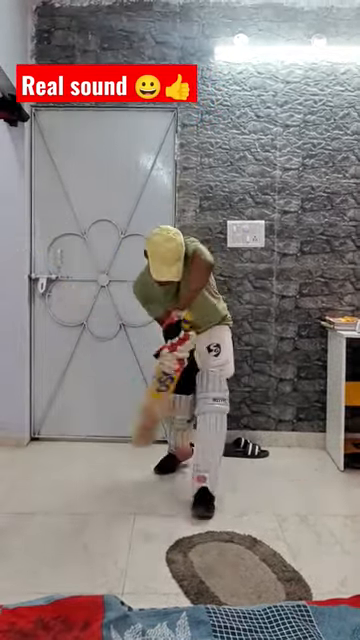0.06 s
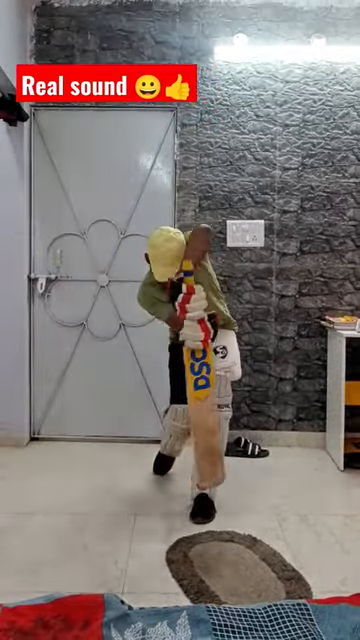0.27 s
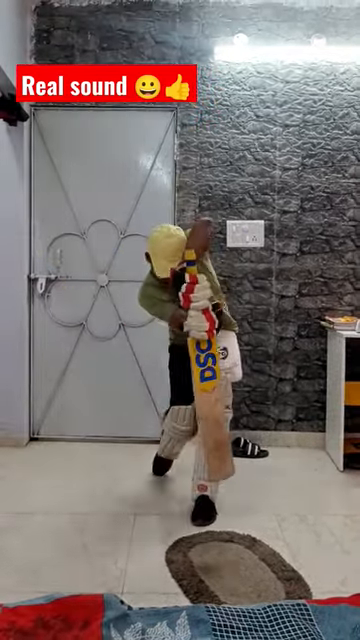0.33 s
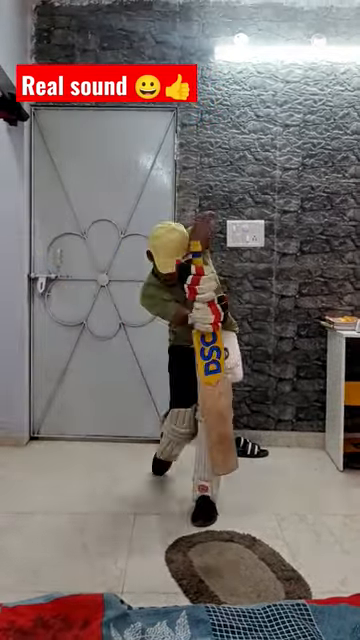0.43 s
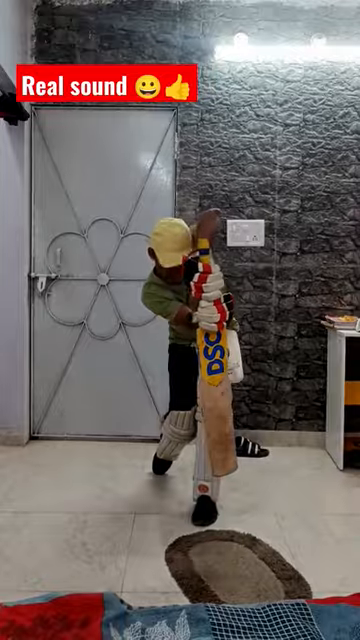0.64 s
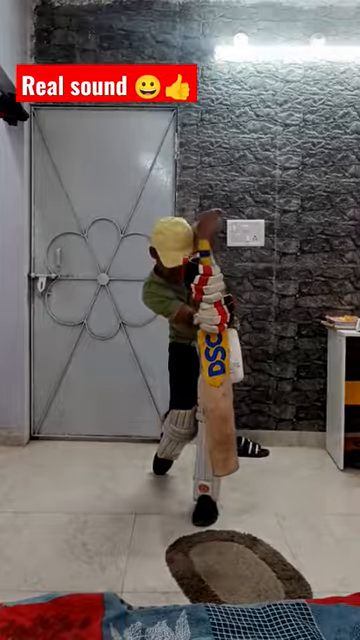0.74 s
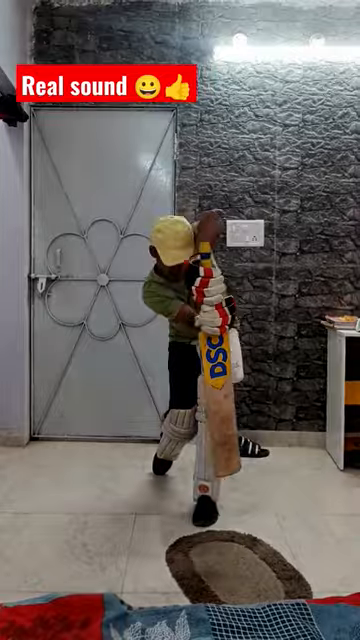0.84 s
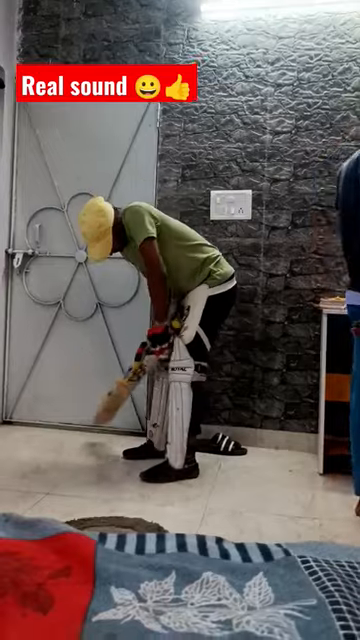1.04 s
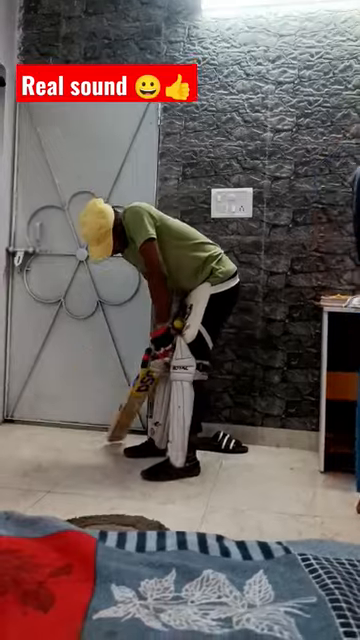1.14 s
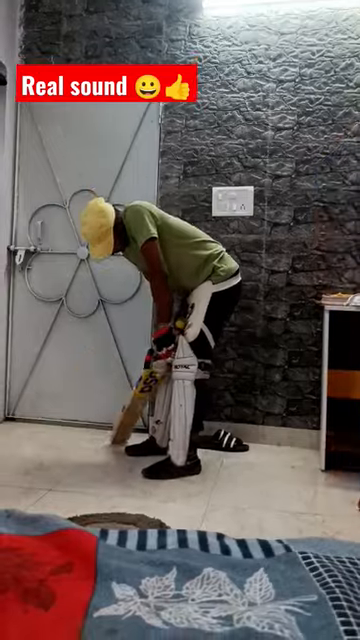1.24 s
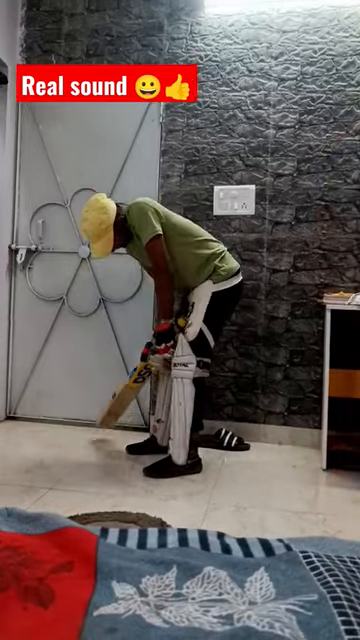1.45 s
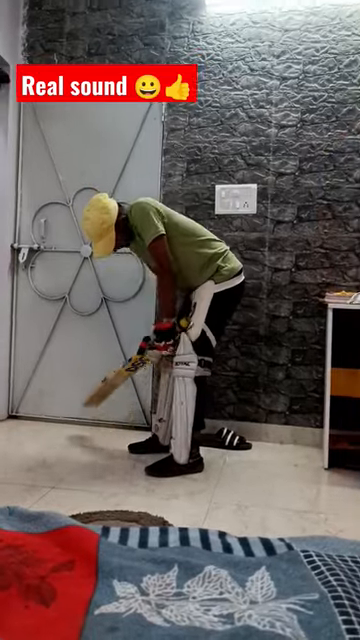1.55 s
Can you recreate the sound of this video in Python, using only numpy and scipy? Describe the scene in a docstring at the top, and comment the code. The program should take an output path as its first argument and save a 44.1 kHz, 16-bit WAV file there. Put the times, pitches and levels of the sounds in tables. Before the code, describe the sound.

A cricket bat cracks against a ball just after it bounces on tiles. The ball thuds into something soft and lightly clangs on metal, echoing in a small room. Then quiet room noise and two soft knocks on the left.

```python
"""A small tiled room, cricket practice. Clothing rustles, the ball pitches on the floor, cracks off the
bat, thuds into something soft and clangs on metal. Blows are filtered noise bursts with wall echoes;
floor, bat, metal and room boom add decaying modes. Steady room noise lies underneath. Then a cut to a
quieter moment, almost only on the left, with a soft double knock on the floor."""
import sys
import numpy as np
from scipy import signal
from scipy.fft import rfft, irfft
from scipy.io import wavfile

SR = 44100
rng = np.random.default_rng(int(sys.argv[2]) if len(sys.argv) > 2 else 0)


def unload_audio(sound):
    """Save the sound as a 16-bit wav file, at the path given as the first command line argument."""
    columns = np.transpose(np.atleast_2d(sound))
    # keep every value between -1 and 1, then stretch to whole-number steps
    steps = np.round(np.clip(columns, -1, 1) * 32767)
    wavfile.write(sys.argv[1], SR, steps.astype(np.int16))


N = 70560

# Wall echo decay. Each row: frequency in Hz, T60 in seconds before each blow's scaling.
WALL_T60_S = [(70, 0.98), (170, 0.75), (400, 0.53), (900, 0.42), (2000, 0.42), (5000, 0.38), (9000, 0.35),
              (15000, 0.25)]
# Left-right likeness. Each row: frequency in Hz, correlation from -1 to 1.
STEREO_CORRELATION = [(60, 1), (150, 1), (350, .82), (700, 0.6), (1300, 0), (15000, 0)]
# Balance before the cut. Each row: frequency in Hz, left minus right in dB.
BALANCE_DB = [(60, 1.5), (200, -2.5), (380, 2.3), (700, -2), (2300, -2), (4400, -4), (6500, -7),
              (9000, 5.5), (15000, 0)]
# Right channel after the cut. Each row: frequency in Hz, gain in dB.
RIGHT_GAIN_DB = [(30, 17.5), (80, -13.5), (180, -30), (700, -33.5), (2000, -22), (5000, -14), (10000, -16),
                 (15000, -2)]

# Room noise before and after the cut. Each row: frequency in Hz, relative density in dB.
NOISE_SPECTRUM_DB = [(18, -67), (30, -19), (240, -3), (281, -4), (364, -4.5), (460, -8.5), (581, -4),
                     (881, -12), (978, -9.5), (1560, -17), (15000, -43)]
QUIET_SPECTRUM_DB = [(18, -53), (30, -8), (89, -4), (260, 1), (404, -5), (448, -5.5), (662, -10.5),
                     (735, -8), (1060, -5.5), (1410, -19.5), (1650, -13.5), (1870, -20.5), (15000, -48.5)]

# Contact spectra. Each row: frequency in Hz, relative density in dB.
PITCH_SPECTRUM_DB = [(40, -48.5), (90, -9.5), (160, 2), (450, 0), (700, -3), (1100, -25), (1700, -20),
                     (3000, -33.5), (6500, -45), (9500, -58), (15000, -73)]
THUD_SPECTRUM_DB = [(40, -31), (100, -13), (160, -1.5), (240, -2), (500, -1), (700, -10), (1000, -24.5),
                    (2500, -21.5), (5000, -11), (6600, -3), (9000, -15), (15000, -14)]
BAT_SPECTRUM_DB = [(40, -50.5), (90, -6.5), (160, -7.5), (350, -2), (620, 0.5), (900, -2), (1300, -18),
                   (2100, -12.5), (3000, -27.5), (6000, -25), (8000, -33), (10500, -38.5), (15000, -38)]
SNAP_SPECTRUM_DB = [(200, -34), (1200, -4.5), (2000, 9.5), (3500, -39), (6500, -9.5), (9000, -22),
                    (15000, -21)]
METAL_SPECTRUM_DB = [(100, -41), (400, -11), (650, -0.5), (1300, -7), (2200, 6), (2900, -5), (3400, -1.5),
                     (6500, -2.5), (7600, -9), (8500, -7.5), (10000, -18.5), (13000, -10.5), (15000, -31)]
TICK_SPECTRUM_DB = [(200, -44), (3000, -26), (7300, -9), (8400, 16), (9800, -21), (15000, -16)]
KNOCK_SPECTRUM_DB = [(40, -41), (110, -20), (170, 2.5), (220, -1.5), (300, -7), (450, -16.5), (800, -24),
                     (3000, -49), (15000, -88)]

# Resonances. Each row: frequency in Hz, relative level in dB, T60 in seconds.
FLOOR_MODES = [(156.6, -3.5, 0.94), (217, 4, 0.19), (411, 10, 0.23), (600, 5.5, 0.33), (1775, 2, 0.059),
               (2390, -9, .17)]
ROOM_MODES = [(204.85, -2, 0.43), (236.3, -0.5, .35)]
BAT_MODES = [(155.25, -3.5, .9), (258.7, -3, .55), (596, 7, 0.53), (694, -6.5, 0.83), (863, 4.5, 0.44),
             (890, -7, 0.34), (1930, -12, 0.62)]
METAL_MODES = [(679, -8, .9), (1080, -1, .18), (1112, -1, .18), (1097, -2, .45), (1516, -11, .7),
               (2005, -6, .5), (2103, 2, .5), (2140, -2, .45), (2326, -7, .5), (2410, -6, .5),
               (2444, -3, .45), (3185, -8, .6), (3255, -9, .6), (3380, -9, .7), (4402, -2, .55),
               (4463, -6, .6), (4670, -7, .8), (5015, -11, .8), (6780, -11, .25), (8450, -10, .1)]

# Ball and feet. Each row: start in seconds, level in dB, treble corner in Hz, relative boom in dB.
THUDS = [(.243, -23, 200, -1.5), (.52, -16.5, 833, -7.5), (.61, -34, 200, -1), (.688, -38.5, 256, 6.5),
         (.815, -39, 188, -0.5), (.88, -39.5, 130, -10.5), (.937, -29, 140, -33)]
# Floor knocks. Each row: start in seconds, level in dB.
KNOCKS = [(1.385, -34), (1.446, -37.5)]

CONTACT_S, SCATTER_DB, BASS_LAG_CYCLES = 0.0023, 2.5, 0.89
RIPPLE_DB, RIPPLE_SPACING_HZ, RIPPLE_MIDPOINT_HZ = 3, 90, 1500
CUT_S, CUT_FADE_S = 0.99, 0.0056
TIME_S = np.arange(N) / SR
FREQ_HZ = np.arange(N + 1) * SR / (2 * N)


def undb(db):
    """Decibels to amplitude."""
    return 10 ** (np.asarray(db) / 20)


def curve(table, hz=FREQ_HZ):
    """Interpolate a table over log frequency."""
    knots_hz, values = np.array(table, float).T
    return np.interp(np.log(np.maximum(hz, 1)), np.log(knots_hz), values)


def filtered(x, response):
    """Apply a response given at FREQ_HZ."""
    return irfft(rfft(x, 2 * N) * response)[..., :N]


def minimum_phase(gain_db):
    """Causal response with these gains."""
    cepstrum = irfft(np.log(undb(gain_db)))
    cepstrum[1:N] *= 2
    cepstrum[N + 1:] = 0
    return np.exp(rfft(cepstrum))


def place(x, start_s, level_db):
    """Set the RMS of the first 50 ms, then delay."""
    x = x * undb(level_db) / np.sqrt(np.mean(x[:, :SR // 20] ** 2))
    return np.pad(x, ((0, 0), (int(start_s * SR), 0)))[:, :N]


def diffuse_noise():
    """Diffuse field: channels alike in the bass, unrelated in the treble."""
    correlation = np.clip(curve(STEREO_CORRELATION), -.99, .99)
    gains = np.sqrt([(1 + correlation) / 2, (1 - correlation) / 2])
    mid, side = filtered(rng.standard_normal((2, N)), gains)
    return np.array([mid + side, mid - side])


def room_response(direct_db, t60_scale, build_s):
    """Direct burst plus wall echoes that build and decay per band; bass builds slowest."""
    grain = np.repeat(rng.standard_normal(N // 32 + 1), 32)[:N]
    early_scatter = undb(SCATTER_DB * grain * np.exp(-TIME_S / 0.037))
    spectrum = rfft(diffuse_noise() * early_scatter, 2 * N)
    centres_hz = 45 * 2 ** np.arange(0, 9, .5)
    echoes = 0
    for hz, selector in zip(centres_hz, np.eye(len(centres_hz))):
        weight = np.interp(FREQ_HZ, centres_hz, selector)
        build = 1 - np.exp(-TIME_S / (build_s + BASS_LAG_CYCLES / hz))
        t60_s = t60_scale * curve(WALL_T60_S, hz)
        envelope = build * np.exp(-np.log(1000) * TIME_S / t60_s)
        band = irfft(spectrum * weight)[:, :N] * envelope
        echoes += band * np.sqrt(np.mean(weight ** 2) * np.mean(envelope ** 2) / np.mean(band ** 2))
    echoes /= np.sqrt(np.sum(echoes ** 2) / 2)
    burst = diffuse_noise() * np.exp(-(TIME_S / CONTACT_S) ** 4)
    return echoes + undb(direct_db) * burst / np.sqrt(np.sum(burst ** 2) / 2)


def blow(spectrum_db, direct_db, t60_scale, build_s):
    """Short contact in the room; dense body resonances ripple the treble."""
    knots_hz = np.arange(0, SR / 2, RIPPLE_SPACING_HZ)
    ripple = np.interp(FREQ_HZ, knots_hz, rng.standard_normal(len(knots_hz)))
    ripple *= np.clip(FREQ_HZ / RIPPLE_MIDPOINT_HZ - .5, 0, 1)
    body = minimum_phase(spectrum_db + RIPPLE_DB * ripple)
    return filtered(room_response(direct_db, t60_scale, build_s), body)


def ringing(modes, waver, rise_s):
    """Decaying modes; echoes make each waver differently left and right."""
    knots_s = np.linspace(0, TIME_S[-1], 70)
    total = 0
    for hz, level_db, t60_s in modes:
        draws = rng.standard_normal((2, 2, len(knots_s)))
        wander = np.array([np.interp(TIME_S, knots_s, real + 1j * imag) for real, imag in draws])
        offset_cycles = (2 * rng.random() - 1) * (1 - curve(STEREO_CORRELATION, hz)) / 2
        phasors = np.exp(2j * np.pi * (rng.random() + np.array([[0], [offset_cycles]])))
        tone = np.exp((2j * np.pi * hz - np.log(1000) / t60_s) * TIME_S)
        total += undb(level_db) * ((1 + waver * wander) * phasors * tone).imag
    return total * (1 - np.exp(-TIME_S / rise_s))


def room_noise(spectrum, level_db):
    """Steady noise, as of a ceiling fan."""
    noise = filtered(diffuse_noise(), undb(curve(spectrum)))
    return noise * undb(level_db) / np.sqrt(np.mean(noise ** 2))


def clothing_swish(start_s, level_db, centre_hz):
    """Faint high brush of cloth in the downswing."""
    hump_db = -20 * np.log10(1 + (4 * np.log((FREQ_HZ + 1) / centre_hz)) ** 2)
    return place(blow(hump_db, direct_db=-25, t60_scale=1, build_s=0.0096), start_s, level_db)


def ball_pitch(start_s, level_db):
    """Ball lands on tiles: hollow thump and ring."""
    thump = blow(curve(PITCH_SPECTRUM_DB), direct_db=-17.5, t60_scale=1, build_s=.005)
    ring = ringing(FLOOR_MODES, waver=0.22, rise_s=0.0059)
    return place(thump, start_s, level_db) + place(ring, start_s, level_db - 6.5)


def thud(start_s, level_db, corner_hz, boom_db):
    """Padded contact: softer means a lower corner. Low room modes boom."""
    rolloff_db = 10 * np.log10(1 + (FREQ_HZ / corner_hz) ** 4)
    boom = ringing(ROOM_MODES, waver=0.061, rise_s=0.013)
    bump = blow(curve(THUD_SPECTRUM_DB) - rolloff_db, direct_db=-11, t60_scale=0.62, build_s=0.0067)
    return place(bump, start_s, level_db) + place(boom, start_s, level_db + boom_db)


def hard_contact(spectrum):
    """First milliseconds of a hard hit, direct sound only."""
    burst = diffuse_noise() * np.exp(-(TIME_S / CONTACT_S) ** 2)
    return filtered(burst, minimum_phase(curve(spectrum)))


def bat_stroke(start_s, level_db, flex_hz=855, flex_s=.0035, flex_db=-7.5):
    """Ball on bat: the blade flexes a few cycles, snaps, cracks through the room and rings."""
    age_s = TIME_S - start_s
    window = np.abs(np.sin(np.pi * np.clip(age_s / flex_s, 0, 1))) ** .5
    flex = -np.sin(2 * np.pi * flex_hz * age_s) * window
    crack = blow(curve(BAT_SPECTRUM_DB), direct_db=-8.5, t60_scale=0.99, build_s=0.013)
    snap = hard_contact(SNAP_SPECTRUM_DB)
    ring = ringing(BAT_MODES, waver=.4, rise_s=0.017)
    return (undb(flex_db) * flex + place(snap, start_s, level_db - 22)
            + place(crack, start_s, level_db) + place(ring, start_s, level_db - 7.5))


def metal_clang(start_s, level_db):
    """Ball on metal: sharp tick, bright clash, ringing modes and overtones."""
    clash = blow(curve(METAL_SPECTRUM_DB), direct_db=-28, t60_scale=1.39, build_s=0.012)
    ring = ringing(METAL_MODES, waver=.6, rise_s=.0015)
    overtones = metal_overtones()
    tick = hard_contact(TICK_SPECTRUM_DB)
    return (place(clash, start_s, level_db + 2) + place(ring, start_s, level_db + 3)
            + place(overtones, start_s, level_db - 7) + place(tick, start_s, level_db - 11.5))


def metal_overtones(count=40, low_hz=1900, high_hz=6800, spread_db=8, t60_s=.55):
    """Dense partials of the metal, one at random in each equal band."""
    jitter, weakness = rng.random((count, 2)).T
    partials_hz = low_hz + (high_hz - low_hz) * (np.arange(count) + jitter) / count
    modes = [(hz, db, t60_s) for hz, db in zip(partials_hz, -spread_db * weakness)]
    return ringing(modes, waver=.4, rise_s=.002)


def floor_knock(start_s, level_db):
    """Soft, low knock with short echoes."""
    knock = blow(curve(KNOCK_SPECTRUM_DB), direct_db=-3, t60_scale=0.3, build_s=0.0031)
    return place(knock, start_s, level_db)


def scene():
    """The cricket shot, then a cut to the quiet moment on the left."""
    shot = ball_pitch(start_s=.2155, level_db=-14.5)
    shot += bat_stroke(start_s=.3305, level_db=-12)
    shot += metal_clang(start_s=.777, level_db=-26)
    shot += clothing_swish(start_s=0.13, level_db=-63.5, centre_hz=11700)
    shot += sum(thud(*row) for row in THUDS)
    shot += room_noise(NOISE_SPECTRUM_DB, level_db=-45)
    shot = filtered(shot, undb(np.array([[.5], [-.5]]) * curve(BALANCE_DB)))
    quiet = room_noise(QUIET_SPECTRUM_DB, level_db=-44.5)
    quiet += sum(floor_knock(*row) for row in KNOCKS)
    quiet[1] = filtered(quiet[1], undb(curve(RIGHT_GAIN_DB)))
    fade = np.clip((TIME_S - CUT_S) / CUT_FADE_S + .5, 0, 1)
    return shot * (1 - fade) + quiet * fade


def record(dry):
    """Soft peak limit, then a steep low-pass."""
    ceiling, cutoff_hz = .9, 15400
    limited = dry / (1 + (np.abs(dry) / ceiling) ** 6) ** (1 / 6)
    return signal.sosfilt(signal.ellip(10, .2, 70, cutoff_hz, fs=SR, output="sos"), limited)


dry = scene()
out = record(dry)
unload_audio(out)
```